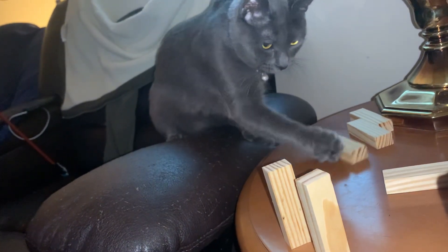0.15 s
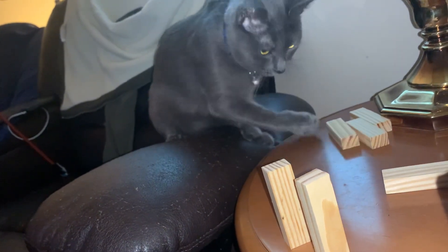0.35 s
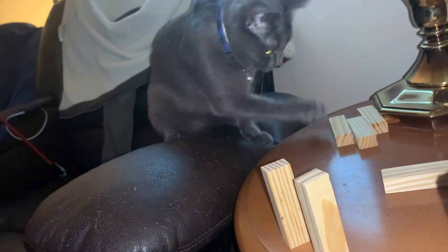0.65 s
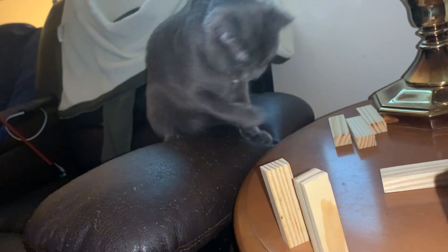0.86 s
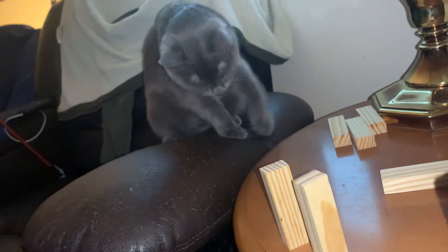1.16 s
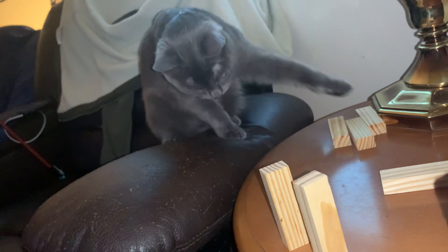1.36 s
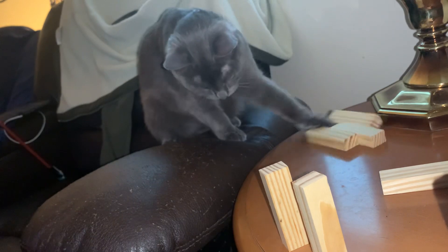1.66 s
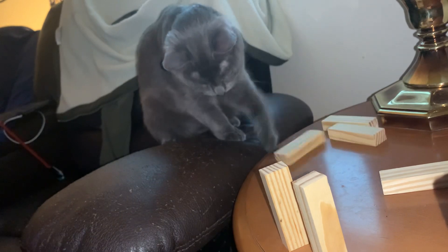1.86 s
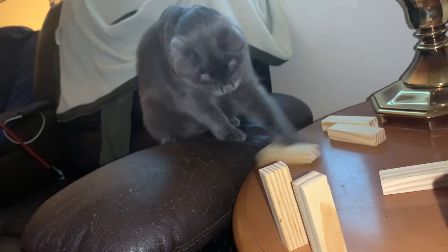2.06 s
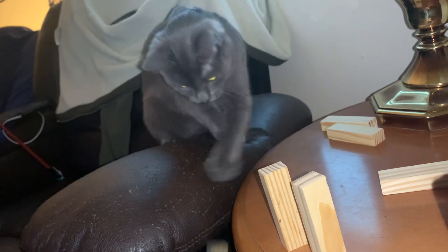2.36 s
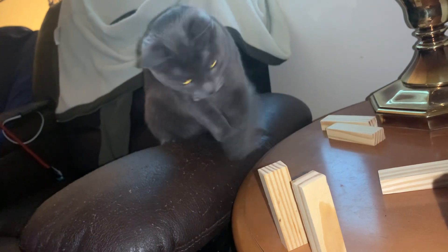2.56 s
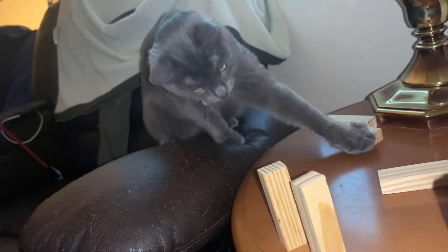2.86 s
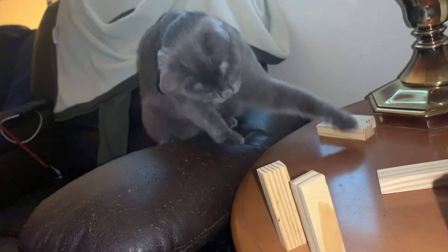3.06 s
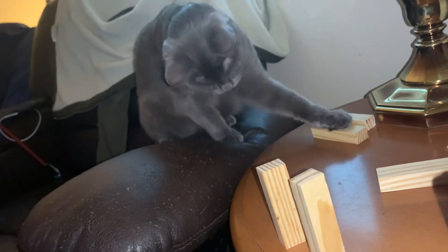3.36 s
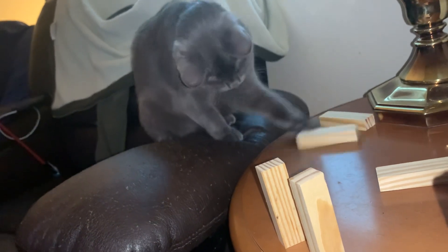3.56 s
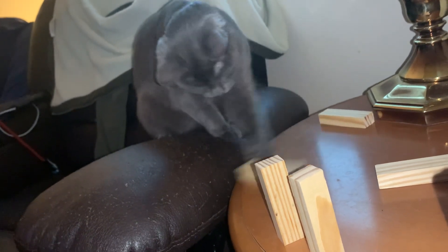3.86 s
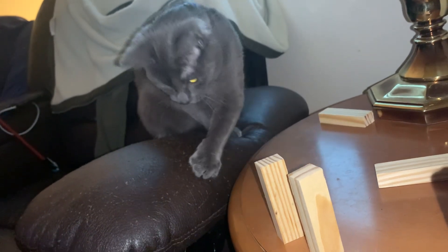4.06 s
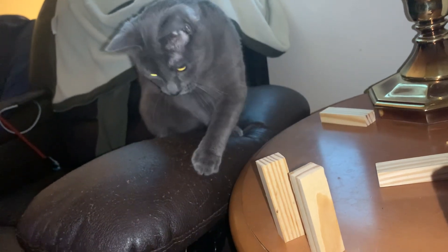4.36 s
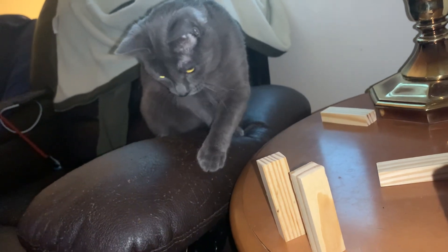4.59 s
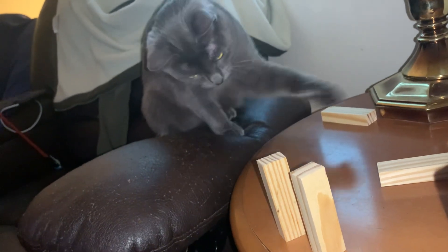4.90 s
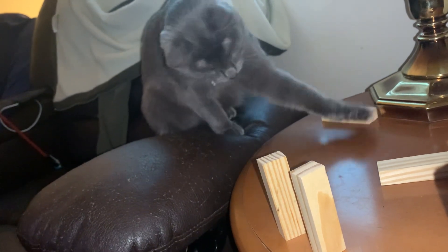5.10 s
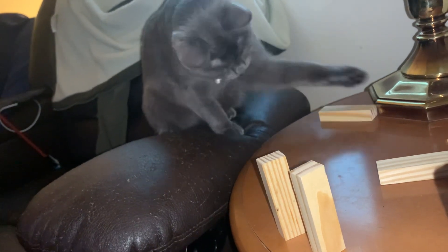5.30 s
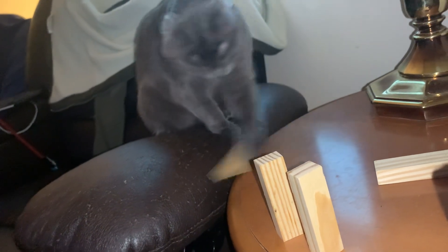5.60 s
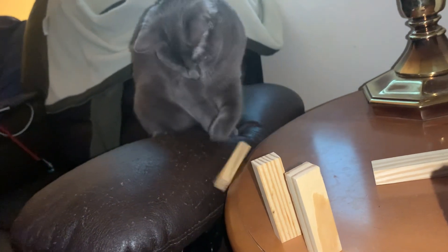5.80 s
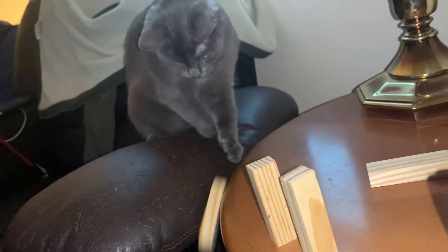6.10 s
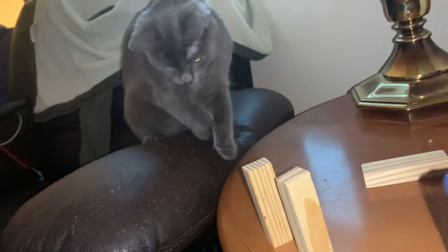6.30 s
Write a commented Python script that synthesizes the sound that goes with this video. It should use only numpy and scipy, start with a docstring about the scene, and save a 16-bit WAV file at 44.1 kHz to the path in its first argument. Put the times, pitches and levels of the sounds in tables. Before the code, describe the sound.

A cat pushes wooden blocks around a tabletop in a quiet room: irregular sharp clacks, faint slides and muffled landings.

```python
"""Small wooden blocks topple, clack and slide on a wooden table, pushed by a cat's paw.
Impacts and friction excite the same damped modes of the wood, and claws tick on it. Blocks pushed over
the edge thud on a leather arm rest and on the floor, where the soft contact excites mainly low modes.
The room is quiet and furnished. A phone with two microphone ports listens from close by, with the table
towards its left port."""
import sys
import numpy as np
from scipy import signal
from scipy.fft import rfft, irfft, next_fast_len
from scipy.io import wavfile
from scipy.ndimage import map_coordinates

SR = 44100
rng = np.random.default_rng(int(sys.argv[2]) if len(sys.argv) > 2 else 0)


def wrap_up_sound(samples):
    """Save the sound to the file named by the first command line argument, as 16-bit audio."""
    columns = np.atleast_2d(samples).T
    # keep every value between -1 and 1, then stretch to whole-number steps
    tamed = np.clip(columns, -1, 1)
    steps = np.round(tamed * 32767).astype(np.int16)
    wavfile.write(sys.argv[1], SR, steps)


N = 284004

# modes of the table and blocks: pitch_hz, width_hz, level_db
WOOD_MODES = [(201.6, 25, -3.5), (313.3, 16, 4.5), (473, 98, -0.5), (612.8, 31, 3.5), (750, 340, -4.5),
              (889, 750, -4.5), (1136, 390, 1.5), (1379, 330, 1.5), (1411, 610, -2), (1719, 350, -0.5),
              (2020, 280, -2.5), (2340, 560, -5.5), (2810, 1000, -3.5), (3250, 1800, -4),
              (4022, 1400, -7.5), (4340, 340, -13), (5084, 940, -15)]
# treble resonances of the phone's sound path: pitch_hz, width_hz, level_db
TREBLE_MODES = [(6900, 400, -5), (8250, 700, -3), (9900, 400, -8), (11400, 500, 0), (12900, 600, -1),
                (15000, 900, -3)]


def clacks():
    """Impact excitation: a hard blow sets the wood's modes ringing while the faces briefly chatter."""
    # blocks striking the table or each other (boom and snap relative to the level):
    # start_s, level_db, boom_db, snap_db, tilt_db_per_octave, favoured_hz
    strikes = [(0.243, -25.5, -11, -39, 7.5, 1750), (0.285, -24, -8.5, -15.5, -3.5, 1740),
               (0.295, -28, -4.5, -14, 8, 1700), (0.539, -22, -4.5, -23.5, 2, 2190),
               (1.611, -43.5, -0.5, -21.5, 1, 2030), (1.631, -35.5, -4, -5, -4.5, 1650),
               (1.774, -10, -13.5, -3, 10, 2020), (2.064, -46, 13.5, 7, -5.5, 1680),
               (2.209, -31, -12, -29.5, -5.5, 2030), (2.227, -13, -21, -41, 3.5, 2060),
               (2.249, -8, -26.5, -18.5, 3, 2020), (2.292, -13.5, -16, -21.5, 4.5, 2020),
               (2.74, -7, -11, -21.5, -10.5, 1400), (2.768, -17, 1.5, -15.5, -8, 1420),
               (2.784, -6.5, -20.5, -10, 5.5, 1740), (2.843, -23.5, -3, -16.5, -14, 1285),
               (2.856, -10.5, -8.5, -24, -9, 1330), (2.875, -37, 14, -23, -4, 753),
               (2.943, -24.5, -4, -39, -7.5, 736), (2.962, -8.5, -10.5, -36, 3, 1878),
               (3.824, -31, -5, -17, -8.5, 1380), (4.392, -42.5, -7.5, -3, 10, 1682),
               (5.757, -2.5, -16, -24.5, 5, 1776), (5.783, -4.5, -18.5, -14, 3, 2616),
               (5.819, -10, -19, -27, 1, 2290), (5.833, -13.5, -11, -29, -4, 1650),
               (5.997, -25.5, -9, -24, -5, 1720), (6.303, -43.5, 7, -3, -7, 1522)]
    # brightest resonances of a hard contact: pitch_hz, width_hz, level_db
    snap_modes = [(6300, 1300, 0), (9600, 700, -3), (11300, 200, 9)]
    chatter_t60_s, wall_delay_s, wall_db, room_db = 0.019, 0.0098, -6.5, -9
    favour_db, favour_octaves = 7.5, 0.12  # the struck spot favours modes near its own pitch
    ring_narrowing, ring_db = 6.9, 8.5  # the lasting ring against the damped blow
    dry, wet, t = np.zeros((2, N)), np.zeros((2, N)), np.arange(SR // 6) / SR
    hz, width, level = np.transpose(WOOD_MODES)
    low = hz < 700  # the table top's own slow modes
    pulse = 1. * (t == 0)
    for start_s, db, boom_db, snap_db, tilt_db, favoured_hz in strikes:
        mode_db = level + rng.normal(0, 1, len(hz)) + tilt_db * np.log2(hz / 2000) * ~low
        mode_db += favour_db * np.exp(-(np.log2(hz / favoured_hz) / favour_octaves) ** 2)
        port_db = mode_db[:, None, None] + rng.normal(0, 2, (len(hz), 2, 1))  # modes radiate unevenly
        damped = modes(list(zip(hz[~low], width[~low], port_db[~low])))
        ring = modes(list(zip(hz[~low], width[~low] / ring_narrowing, port_db[~low] + ring_db)))
        table_top = modes(np.transpose([hz, width, mode_db])[low])
        block = filtered(pulse, lambda f: (damped(f) + ring(f) * blunt(f, 6400)) * blunt(f, 5500))
        boom = amp(boom_db) * unit_peak(filtered(pulse, lambda f: table_top(f) * blunt(f, 1000)))
        snap = filtered(pulse, lambda f: modes(snap_modes)(f) * blunt(f, 18000))
        snap = amp(snap_db) * unit_peak(snap)
        chatter = rng.standard_normal(len(t)) ** 3 * decay(t, chatter_t60_s) * rise(t, 0.001)
        force = pulse + chatter / np.linalg.norm(chatter)
        blow = unit_peak(signal.fftconvolve(block, force[None], axes=1)[:, :len(t)]) + snap
        add(dry, amp(db) * (blow + boom), start_s)
        add(dry, amp(db + wall_db) * blow[::-1], start_s + wall_delay_s)  # a near wall's mirrored echo
        add(wet, amp(db + room_db) * room(unit_peak(block[0]) + snap + boom), start_s + 0.004)
    return ports(dry, left_db=1.0) + wet


def thuds():
    """Cushioned impact: a dry tick at first touch, then a low push that shakes floor and room."""
    # blocks and paw landing on something soft: start_s, level_db, pitch_hz, relative_tick_db
    landings = [(0.079, -51, 366, -25), (0.649, -44, 324, -6.5), (2.575, -20, 372, -21),
                (4.125, -35, 217.3, 2), (4.291, -26, 327, -12), (4.416, -30, 162, -12),
                (4.456, -37, 79.8, -33.5), (4.514, -39, 179, -17), (4.659, -46.5, 117.4, -15),
                (5.139, -47, 302, -16), (5.592, -28, 138, -3), (6.302, -35.5, 200, -8.5),
                (6.345, -21, 234, -27)]
    # modes of the floor and room: pitch_hz, width_hz, level_db
    floor_modes = [(48.3, 29, -8), (76.5, 25, -2), (138, 14, -2.5), (200, 13, 4), (310, 52, -1.5),
                   (433, 110, -3), (860, 8100, -24)]
    sink_s = 0.0027  # the weight follows the first touch
    out, t = np.zeros((2, N)), np.arange(SR // 2) / SR
    for start_s, db, hz, tick_db in landings:
        push = np.sin(2 * np.pi * hz * t) * decay(t, t60_s=0.019) * rise(t, 0.0012) ** 2
        push = filtered(push, lambda f: low_cut(f, 0.27 * hz) ** 2)  # the push carries little deep bass
        cushioned = lambda f: modes(floor_modes)(f) * low_cut(f, 1.3 * hz) * blunt(f, 1.59 * hz)
        shake = rng.standard_normal(len(t)) * decay(t, t60_s=0.056) * rise(t, 0.0069)
        shake = filtered(shake, cushioned)
        tick = np.diff(rng.standard_normal(len(t) + 1)) * decay(t, t60_s=0.017)
        weight = unit_peak(unit_peak(push) + 0.57 * unit_peak(shake))
        blow = amp(db) * (np.roll(weight, round(sink_s * SR)) + amp(tick_db) * unit_peak(tick))
        add(out, blow[None] * amp([[-.6], [.6]]), start_s)
        add(out, amp(-9.5) * room(blow), start_s + 0.0032)
    return out


def slides():
    """Sliding friction: fine grains and small catches drive the wood's modes, with a hiss above."""
    # blocks and paw sliding: start_s, end_s, rub_db, change_by_end_db, relative_hiss_db
    strokes = [(0.028, 0.32, -66.5, 4.5, -10), (0.503, 0.567, -72, 32.5, -42),
               (1.117, 1.16, -63.5, 4.5, -20), (1.485, 1.59, -66.5, 12, -12), (1.573, 1.84, -54.5, 4, -21),
               (2.001, 2.036, -75, 18.5, 9), (2.045, 2.249, -57.5, -10.5, -4.5),
               (3.177, 3.352, -62, -8.5, -11), (3.412, 3.494, -68.5, -5, -7.5),
               (3.542, 3.67, -51.5, -34, -4.5), (3.698, 3.816, -66, -6.5, -4), (3.812, 3.954, -62, 9, -1),
               (4.389, 4.474, -56.5, -25.5, -44), (5.086, 5.175, -73, 13, -15.5),
               (5.311, 5.363, -65, 2.5, -0.5), (5.355, 5.616, -52.5, -1.5, -5.5),
               (5.613, 5.66, -66.5, -2, 14), (5.925, 6.09, -53, -8.5, -15)]
    catches_per_s, catch_db, swell_db, swells_per_s = 120, 20, 5, 30
    gains = np.zeros((2, N))
    for start_s, end_s, db, change_db, hiss_db in strokes:
        t = np.arange(0, end_s - start_s + 0.0019, 1 / SR)
        fade = np.clip(np.minimum(t / 0.031, (t[-1] - t) / 0.063), 0, 1)
        add(gains, fade * amp(db + change_db * t / t[-1] + np.array([[0], [hiss_db]])), start_s)
    rub_gain, hiss_gain = gains
    grip = wander(rate_hz=220.5)
    rub_grains, hiss_grains = rng.standard_normal((2, N)) * amp([[2.5], [1.2]] * grip)
    rub_grains += amp(catch_db) * rng.standard_normal(N) * (rng.random(N) < catches_per_s / SR)
    # spectrum of the friction force: frequency_hz, density_db
    friction_spectrum = [(150, -15), (400, 2.5), (1130, -1.5), (2200, -3), (3200, -6.5), (3700, -11),
                         (7000, -16.5), (8000, -50.5)]
    friction = amp(1) * unit_rms(filtered(rub_grains, lambda f: amp(along(friction_spectrum, f))))
    # a slide with little hiss is a heavy drag: its rub tilts to the low modes
    tilt_db_per_octave = 0.35 * (10 + 20 * np.log10((hiss_gain + 1e-9) / (rub_gain + 1e-9)))
    rub = np.zeros(N)
    for hz, width, db in WOOD_MODES:
        ring = filtered(friction, modes([(hz, 0.4 * width, db)]))  # rubbing damps the wood less
        travel_db = swell_db * wander(swells_per_s)  # each mode swells and fades as the block travels
        rub += rub_gain * amp(tilt_db_per_octave * np.log2(hz / 1500) + travel_db) * ring
    hiss = hiss_gain * unit_rms(filtered(hiss_grains, lambda f: modes(TREBLE_MODES)(f) ** 2))
    return ports(rub + hiss, left_db=-0.5) + amp(-9) * room(rub + hiss)[:, :N]


def claws():
    """Noise-burst excitation: a short scratch rings the treble resonances and a little of the wood."""
    # claws ticking on the table top: start_s, level_db
    ticks = [(1.59, -52), (1.674, -43), (3.567, -34.5), (4.076, -45.5), (4.123, -36), (5.626, -43.5)]
    out, t = np.zeros(N), np.arange(SR // 10) / SR
    response = lambda f: modes(TREBLE_MODES)(f) + amp(-4.5) * modes(WOOD_MODES)(f)
    for start_s, db in ticks:
        scratch = rng.standard_normal(len(t)) * decay(t, t60_s=0.05) * rise(t, 0.0012)
        add(out, amp(db) * unit_peak(filtered(scratch, response)), start_s)
    return ports(out, left_db=-4.5) + amp(-8.0) * room(out)[:, :N]


def room(x):
    """Diffuse reverberation: a fresh noise tail in which each frequency decays at its own rate."""
    # reverberation time: frequency_hz, t60_s
    decay_times = [(150, 0.54), (400, 0.18), (1000, 0.22), (2800, 0.29), (5000, 0.26), (8000, 0.036),
                   (15000, 0.016)]
    # likeness of the tail at the two ports: frequency_hz, coherence
    coherence = [(100, 0.94), (350, 0.8), (800, 0.18)]
    hz, t, spectra = signal.stft(rng.standard_normal((2, SR // 2)), SR, nperseg=256)
    tail = signal.istft(spectra * decay(t, along(decay_times, hz)[:, None]), SR, nperseg=256)[1]
    tail = ports(blend(tail, coherence), left_db=-2.3)  # the tail is stronger on the right
    delayed = np.pad(x, (round(0.0029 * SR), 0))
    return signal.fftconvolve(delayed[None], tail / np.linalg.norm(tail[0]), axes=1)


def air():
    """Ambient noise: a slowly wavering rumble, coherent at both ports, under a faint diffuse hiss."""
    # room noise before the hiss is lifted: frequency_hz, density_db
    spectrum = [(12, -49), (20, -19.5), (60, 1.5), (96, -10.5), (127, -3), (193, -21.5), (485, -37.5),
                (1120, -44.5), (7950, -53), (8650, -52.5), (10200, -47.5), (14700, -55), (16000, -61.5)]
    # likeness of the noise at the two ports: frequency_hz, coherence
    coherence = [(50, 0.87), (300, 1), (700, 0.14)]
    noise = filtered(rng.standard_normal((2, N)), lambda f: amp(along(spectrum, f)))
    noise = unit_rms(blend(noise, coherence))
    hiss = filtered(noise, lambda f: 1 / (1 + (300 / (f + 1)) ** 4))
    rumble = amp(0.3 * wander(rate_hz=4)) * (noise - hiss)
    return amp(-69) * (rumble + amp(12.0) * hiss)


def ports(x, left_db):
    """Path difference and shadowing: above the bass the left port leads; the phone shades the right."""
    lead_s, shade_db, shade_hz = 20 / SR, 4.5, 3100
    side = np.array([[1], [-1]])
    phase = lambda f: np.pi * f * lead_s / (1 + (420 / (f + 1)) ** 4)
    balance_db = lambda f: left_db + shade_db * np.exp(-np.log2((f + 1) / shade_hz) ** 2)
    response = lambda f: amp(side * balance_db(f) / 2) * np.exp(side * 1j * phase(f))
    return filtered(x * np.ones((2, 1)), response)


def blend(pair, coherence):
    """Partial coherence: two independent signals are mixed as mid and side, frequency by frequency."""
    angle = lambda f: np.arccos(np.clip(along(coherence, f), -1, 1)) / 2
    mid, side = filtered(pair, lambda f: np.array([np.cos(angle(f)), np.sin(angle(f))]))
    return np.array([mid + side, mid - side])


def modes(table):
    """Modal superposition: the response of damped resonators summed with alternating sign."""
    return lambda f: sum((-1) ** k * amp(db) * 1j * f * width / (hz * hz - f * f + 1j * f * width)
                         for k, (hz, width, db) in enumerate(table))


def blunt(f, corner_hz):
    """Third-order low-pass: a contact of finite duration has no far treble."""
    return 1 / (1 + 1j * f / corner_hz) ** 3


def low_cut(f, corner_hz):
    """First-order high-pass response."""
    return 1j * f / (corner_hz + 1j * f)


def filtered(x, response):
    """Linear filtering: the spectrum of x times a complex response."""
    size = next_fast_len(x.shape[-1] + SR // 4)
    return irfft(rfft(x, size) * response(np.fft.rfftfreq(size, 1 / SR)), size)[..., :x.shape[-1]]


def along(points, hz):
    """Interpolates (frequency_hz, value) points on a log axis."""
    frequencies, values = np.transpose(points)
    return np.interp(np.log(hz + 1), np.log(frequencies + 1), values)


def wander(rate_hz):
    """A smooth curve through rate_hz random values a second."""
    return map_coordinates(rng.standard_normal(int(N * rate_hz / SR) + 4), [np.arange(N) * rate_hz / SR])


def add(out, x, start_s):
    """Superposes x on out from start_s."""
    part = out[..., round(start_s * SR):][..., :x.shape[-1]]
    part += x[..., :part.shape[-1]]


def decay(t, t60_s):
    return amp(-60 * t / t60_s)


def rise(t, time_constant_s):
    return 1 - np.exp(-t / time_constant_s)


def amp(db):
    return 10 ** (np.asarray(db) / 20)


def unit_rms(x):
    return x / np.sqrt(np.mean(x ** 2) + 1e-20)


def unit_peak(x):
    return x / np.max(np.abs(x))


def scene():
    """Superposition: the pressures of all sources add at the two ports."""
    return clacks() + thuds() + slides() + claws() + air()


def record(dry):
    """Phase stereo: the phone spreads the left port's treble by phase alone, then limits the band."""
    # phase lead of the left channel: frequency_hz, lead_half_turns
    treble_lead = [(7000, 7.8), (8000, 7.1), (9400, 6.8), (10600, 6), (11600, 5.85), (13000, 5),
                   (15000, 4.25), (16000, 4)]
    split_hz, top_hz = 7100, 16700
    high = lambda f: 1 / (1 + (split_hz / (f + 1)) ** 16)
    side = np.array([[1], [-1]])
    treble = filtered(dry[[0, 0]], lambda f: high(f) * np.exp(side * .5j * np.pi * along(treble_lead, f)))
    lower_band = filtered(dry, lambda f: 1 - high(f))
    return filtered(treble + lower_band, lambda f: np.clip((top_hz - f) / 700, 0, 1) ** 2)


dry = scene()
out = record(dry)
wrap_up_sound(out)
```